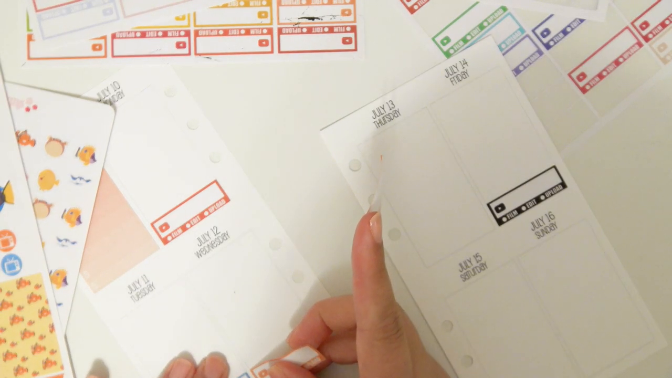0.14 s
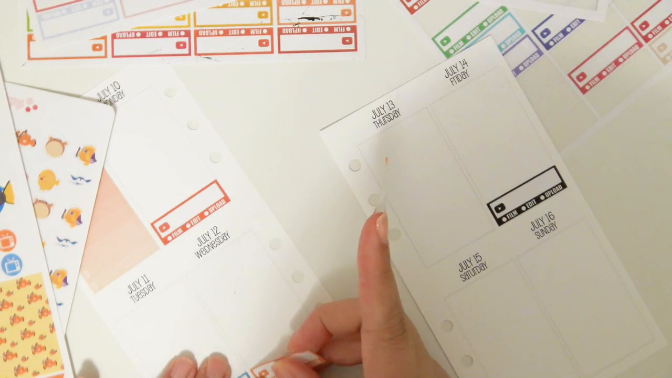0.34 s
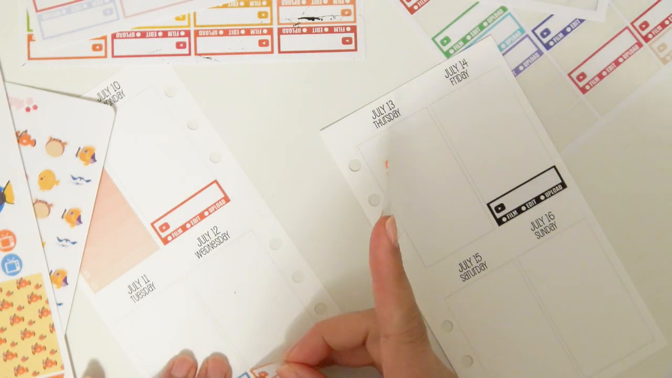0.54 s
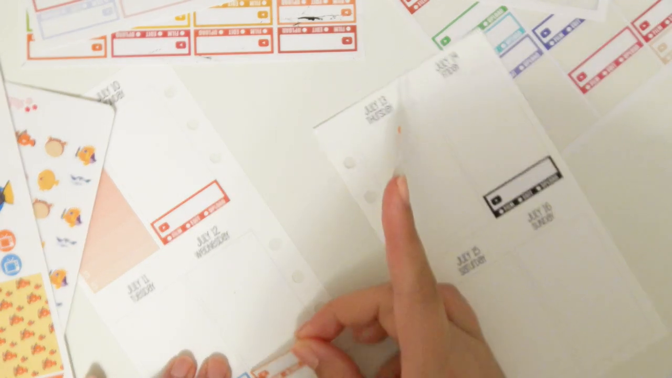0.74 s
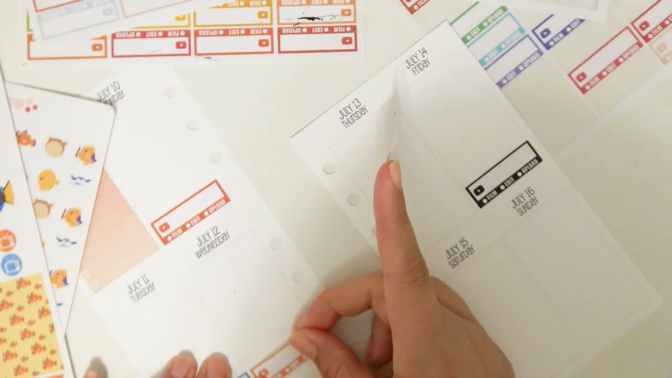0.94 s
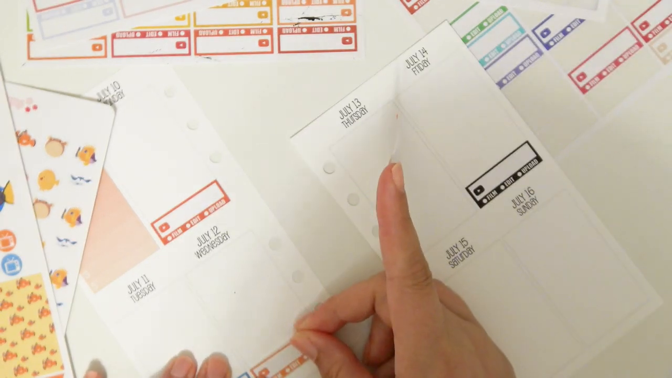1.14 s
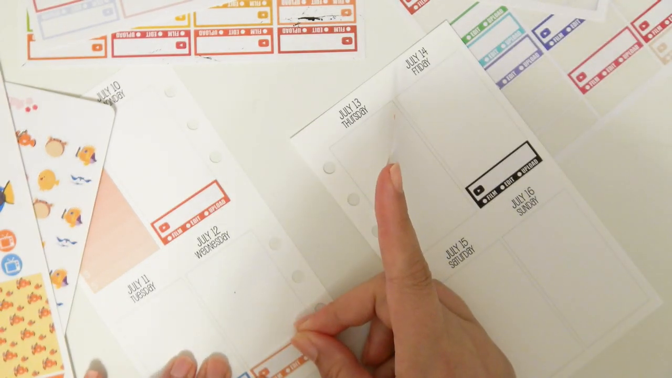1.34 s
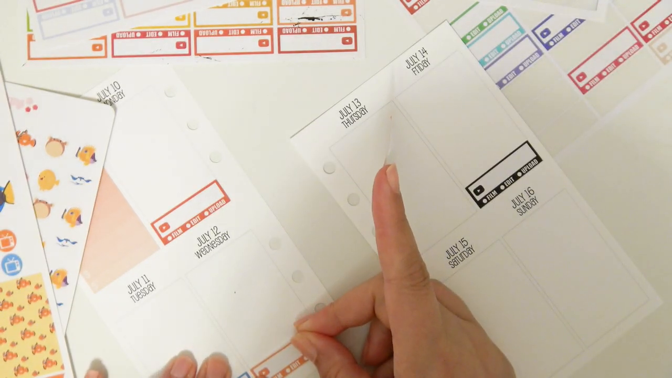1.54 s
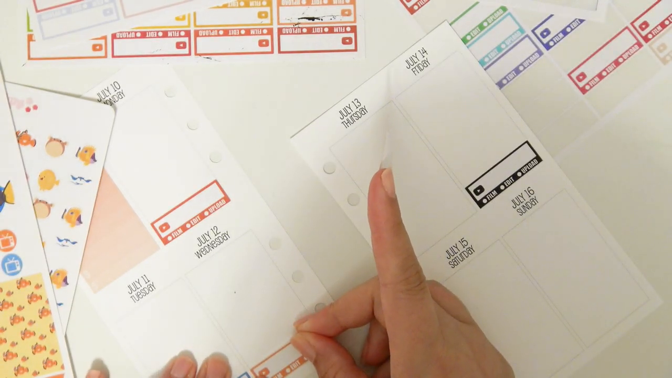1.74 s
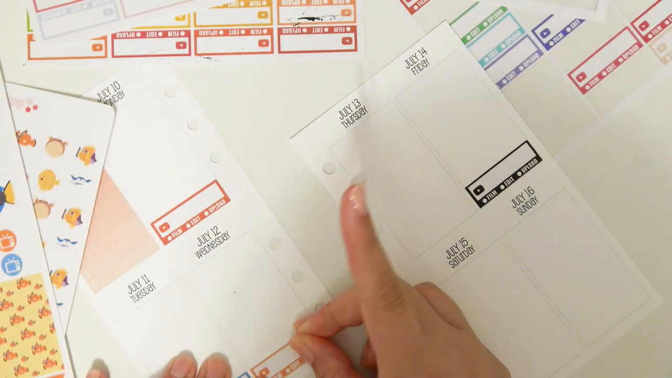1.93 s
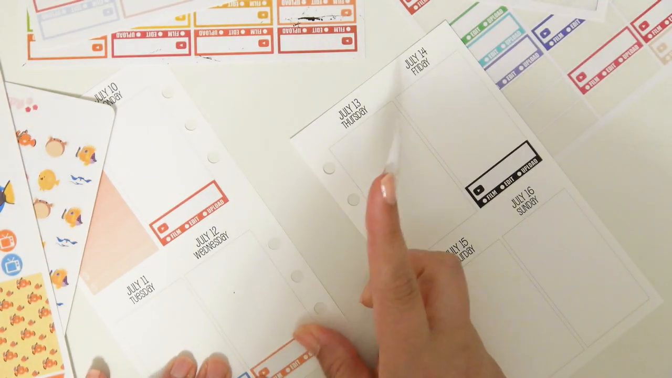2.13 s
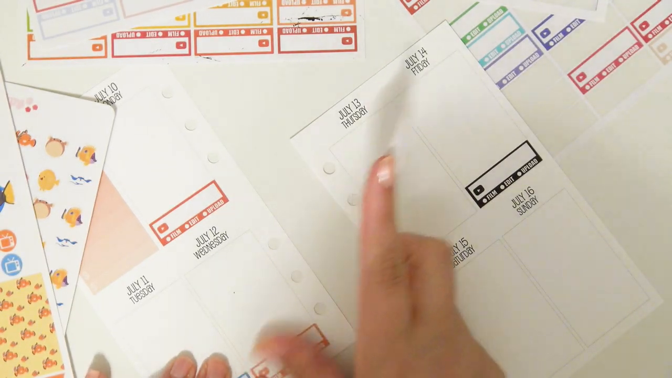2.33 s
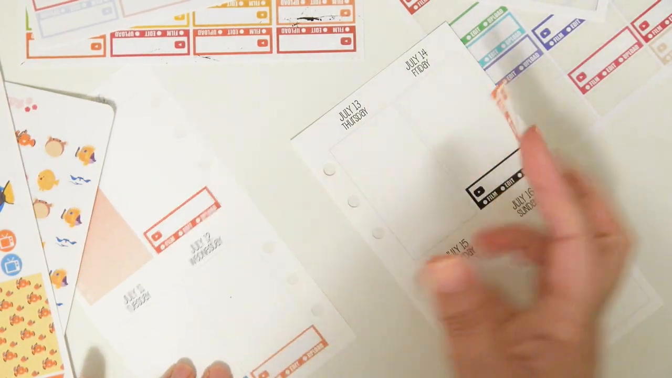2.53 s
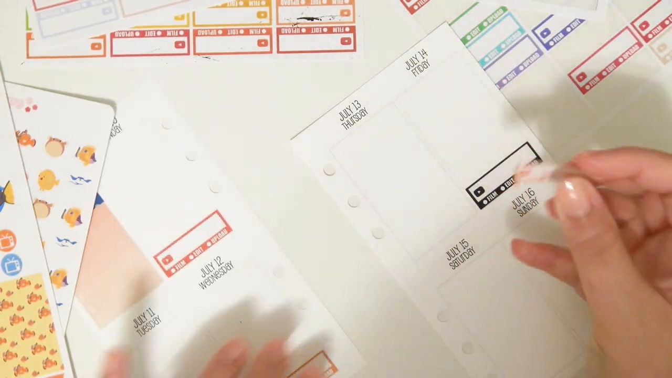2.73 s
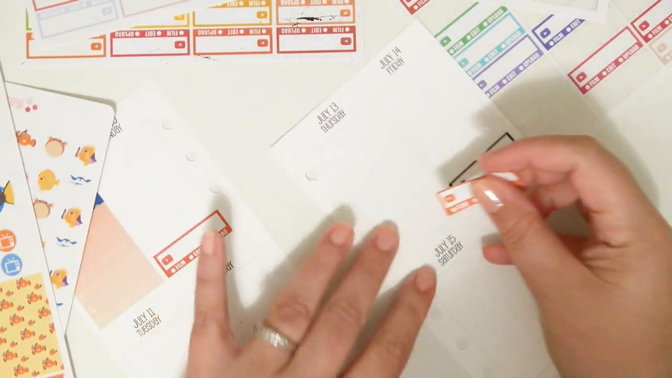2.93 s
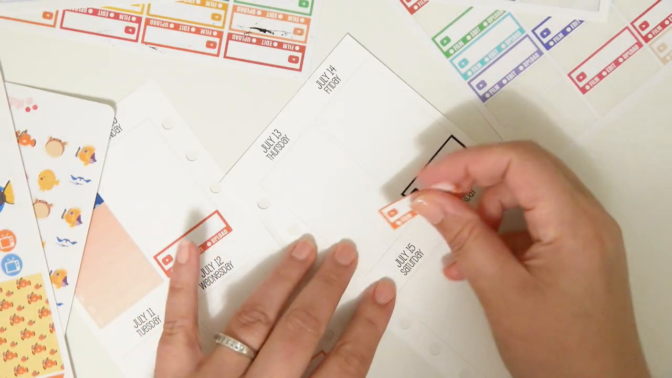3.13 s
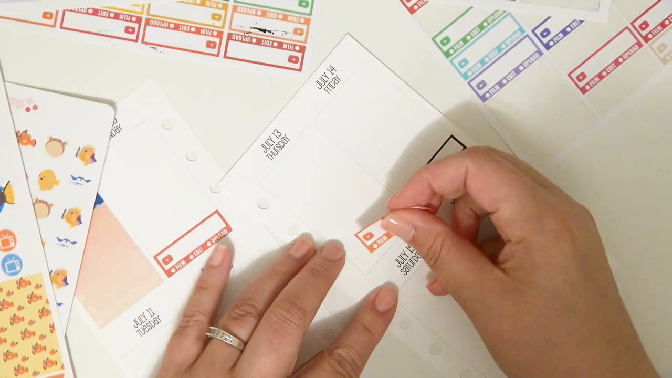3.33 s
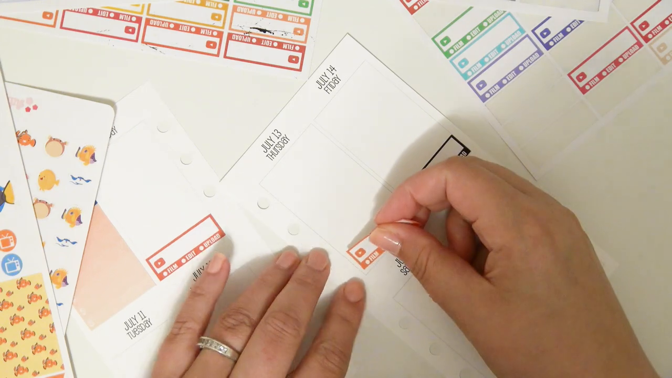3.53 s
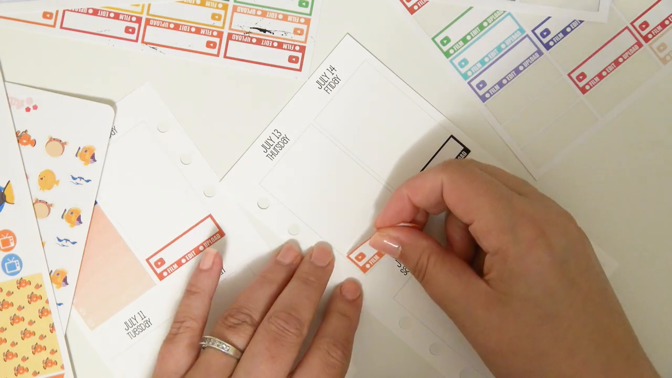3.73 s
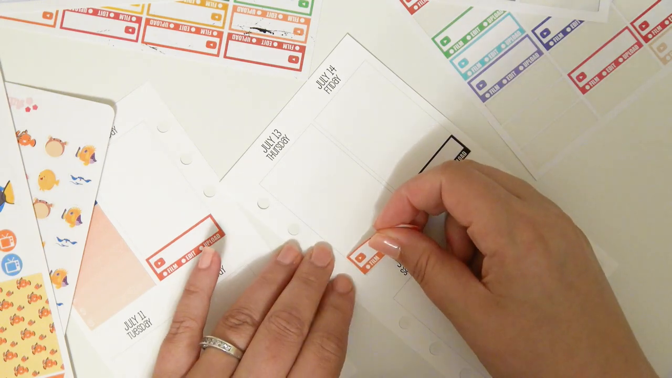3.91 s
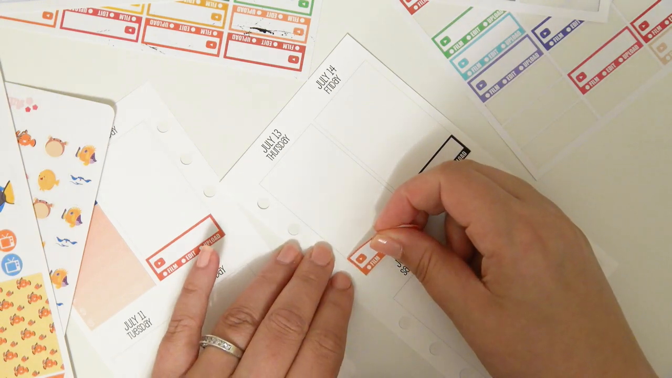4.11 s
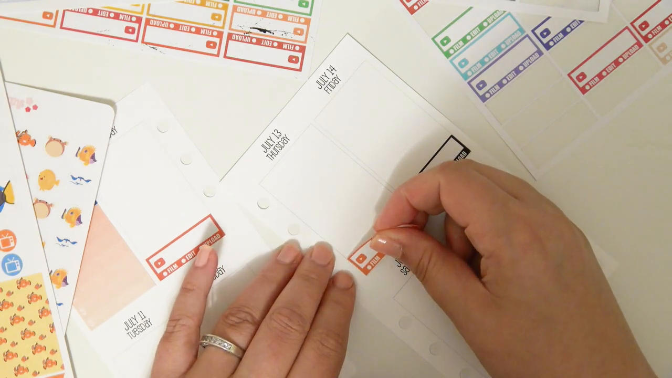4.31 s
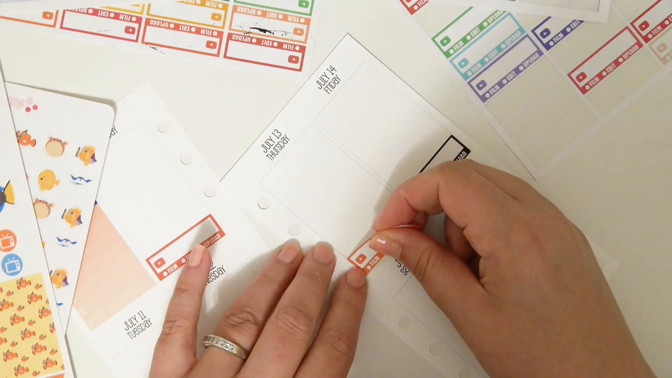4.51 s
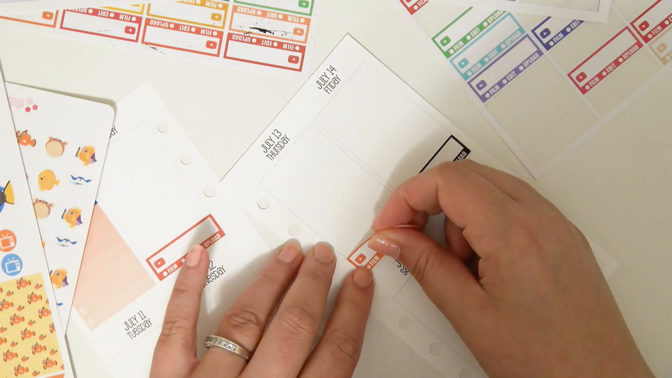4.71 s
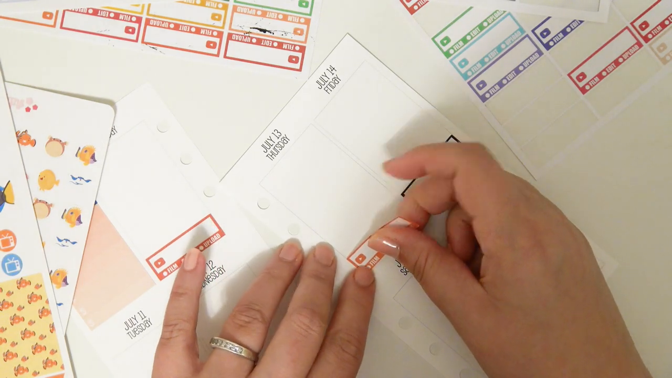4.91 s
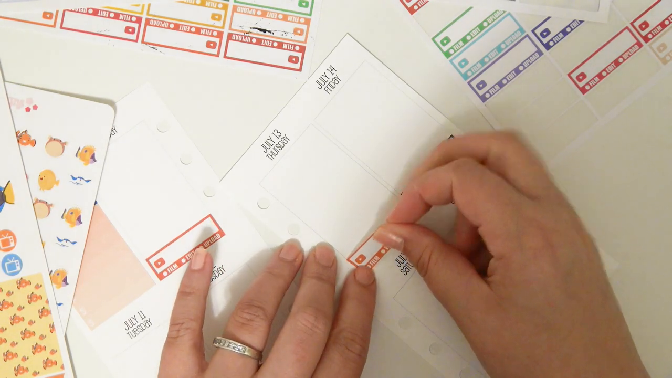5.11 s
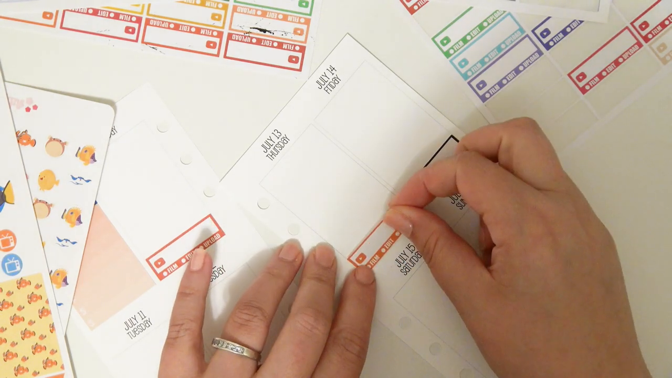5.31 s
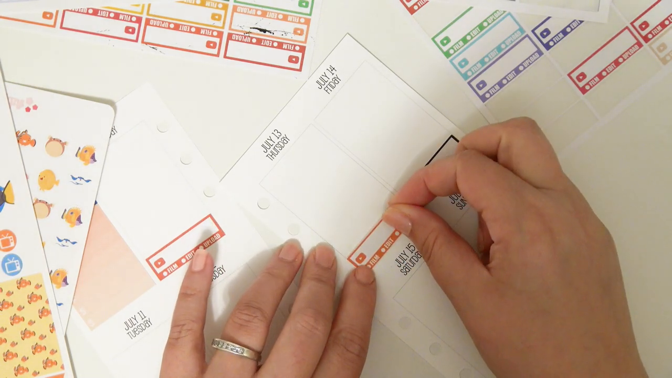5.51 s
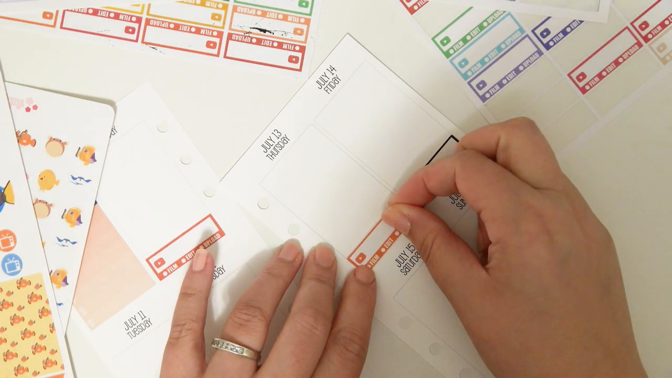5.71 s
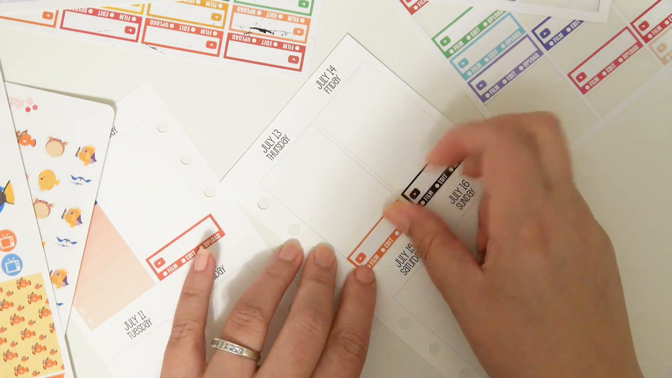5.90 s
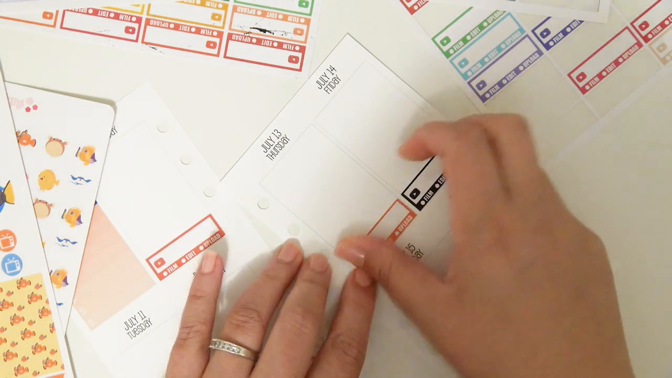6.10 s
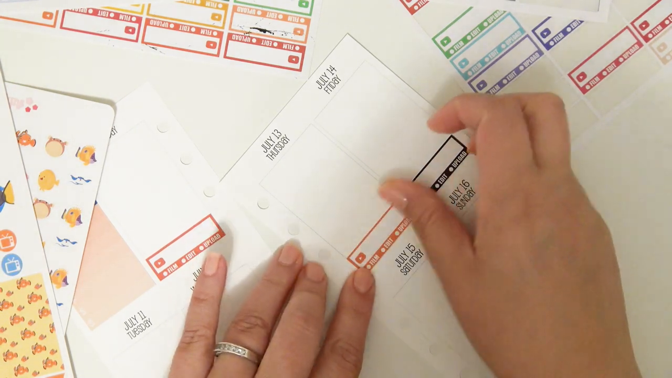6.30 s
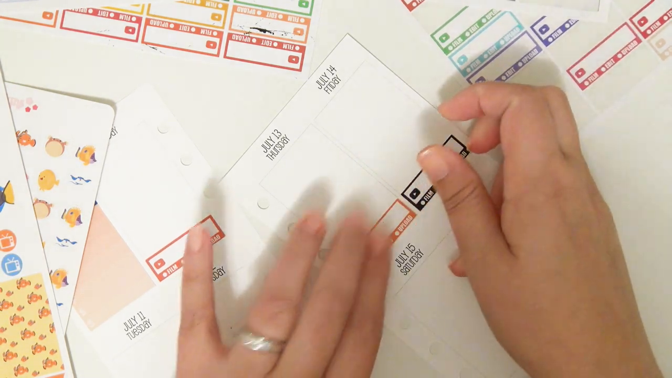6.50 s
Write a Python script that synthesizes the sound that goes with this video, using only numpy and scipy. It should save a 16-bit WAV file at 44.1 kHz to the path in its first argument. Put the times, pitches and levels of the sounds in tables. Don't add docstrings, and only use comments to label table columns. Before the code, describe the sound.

In a small quiet room with a very short tail, thin paper rustles and glue lets go in tiny bright clicks. Crisp snaps come early, around two seconds and most densely near five. Between them fingertips thump the tabletop dully and skin brushes the page. Long gaps leave only soft hiss and a distant low drone. The microphone is close and detailed.

```python
import sys
import numpy as np
from scipy import signal
from scipy.fft import rfft, irfft
from scipy.io import wavfile

SR = 44100
rng = np.random.default_rng(int(sys.argv[2]) if len(sys.argv) > 2 else 0)


def volts_from_decibels(level):
    exponent = np.asarray(level, float) / 20
    return 10 ** exponent


def int16_out(signal):
    q = np.round(np.clip(np.atleast_2d(signal).T, -1, 1) * 32767)
    wavfile.write(sys.argv[1], SR, q.astype(np.int16))


N = 288855

# frequency in Hz, density in dB per Hz.
ROOM_TONE = [(15, -51), (25, -24), (41, -19.5), (64, -0.5), (92, -15.5), (117, -12.5), (166, -17.5),
             (185, -15.5), (256, -16), (285, -16.5), (531, -22), (775, -26.5), (962, -24), (1700, -36),
             (16000, -42.5)]
ROOM_TONE_DB = -48.5
# centre in Hz, width in Hz, level in dB.
MOTOR_DRONE = [(59.27, 5.4, -54), (119.4, 9, -62), (154.25, 13.7, -57.5), (954, 78.9, -65.5),
               (513, 79, -74.5)]
# frequency in Hz, left minus right in dB.
STEREO_LEAN = [(60, -3), (130, -6.5), (290, 2), (640, 1), (1410, 1), (3100, 0), (6820, 1.5), (15000, -1)]
# frequency in Hz, correlation from 0 to 1.
STEREO_LIKENESS = [(60, 0.96), (180, 0.95), (550, 0.88), (1650, 0.91), (4970, 0.64), (15000, 0.67)]

# frequency in Hz, density in dB per Hz.
RUSTLE = [(250, -34.5), (500, -5.5), (900, -5.5), (1500, -1), (3000, -3), (6000, -3.5), (9000, 0.5),
          (11500, 6.5), (13500, 7), (16000, 2)]
RUSTLE_CENTRES_HZ = (1900, 4300, 7600, 11800)
RUSTLE_TOP_HZ = 15900
# start in seconds, length in seconds, bright hiss in dB,
# dull range against it in dB, middle range against it in dB.
SLIDES = [(0, 0.028, -71, -12, 5), (0.197, .045, -57.5, -13, -6.5), (0.326, 0.1, -58.5, -3, -5.5),
          (0.476, 0.061, -56, -3, -2), (0.563, .045, -57, -3, -2), (1.992, 0.081, -67, 10.5, 3.5),
          (2.107, 0.22, -63, 4.5, -2.5), (2.223, 0.047, -48.5, -4, -10), (2.359, .075, -47, -0.5, -9),
          (2.517, .06, -56, -5, -1), (2.569, 0.12, -51, -7.5, -4), (3.145, 0.091, -57, 4, -2.5),
          (3.569, .09, -74, 5, 3), (4.904, .03, -49.5, -10, -4), (4.99, 0.17, -57.5, -8.5, -4),
          (6.081, 0.065, -49, -1.5, -6.5), (6.159, 0.039, -63, 5.5, 0), (6.254, .09, -50, 1.5, -5),
          (6.37, 0.031, -55, 1.5, -2.5)]
# middle in seconds, half length in seconds,
# bright hiss in dB, dull range against it in dB, middle range against it in dB.
BRUSHES = [
    (0.812, 0.089, -56.5, -0.5, -1),
    (2.759, 0.078, -63.5, -2, -1),
    (2.975, 0.061, -50, -3, -2.5),
    (3.336, .05, -67.5, 6.5, -2.5),
    (3.508, 0.044, -56.5, -7, -3),
    (4.758, 0.026, -61, -7.5, -3.5),
    (6.472, 0.043, -66.5, 2, 0),
]
# start in seconds, bright hiss in dB,
# dull range against it in dB, middle range against it in dB, fade in dB per second.
SETTLES = [
    (0.606, -36.5, -5.5, -0.5, 240.5),
    (2.054, -42, 2.5, -1.5, 342),
    (3.012, -42, -4, 0.5, 93),
    (3.672, -63, 4.5, 5, 82.5),
    (4.93, -43.5, -11.5, 6, 450),
    (5.138, -41.5, 0, 2, 186),
    (5.923, -45.5, -0.5, 1.5, 162),
    (6.415, -59.5, 1, -3, 96),
]

# strongest slip in seconds, peak in dB, ring in Hz,
# body below 4 kHz in dB, loss per later slip in dB.
TEARS = [(0.0173, -37.5, 6660, -19, 14), (.6024, -2.5, 10800, -25, 13.5), (0.6046, -4, 10200, -13, 8.5),
         (.6062, -19.5, 3100, -12, 6.5), (2.0492, -7.5, 10200, -8, 10.5), (2.0563, -22, 7500, -20, 7),
         (2.575, -18, 4650, -15, 6), (2.8283, -32.5, 8040, -12, 8), (3.0079, -21, 8300, -11, 4),
         (3.0113, -21, 3000, -14, 16), (3.0117, -12, 11300, -23.5, 7), (3.1797, -29.5, 4000, 0.5, 7),
         (3.6628, -35, 2470, 8, 6.5), (4.9244, -15.5, 12500, -19, 0), (4.927, -8.5, 7350, -19.5, 7),
         (5.0542, -27, 8550, -20, 12), (5.055, -36.5, 2870, -12, 13), (4.89, -29, 12200, -17, 3),
         (5.0658, -20, 10100, -28, 8), (5.097, -23.5, 11000, -14, 6), (5.119, -27.5, 9900, -19, 0.5),
         (5.1331, -1, 12000, -16, 7.5), (5.9201, -10.5, 12000, -15, 3.5), (5.9246, -21, 11500, -16, 7)]
# start in seconds, peak in dB, ring in Hz, body below 4 kHz in dB.
TICKS = [(.0286, -42, 6500, -16), (.1952, -43, 11900, -16), (.3241, -34, 8000, -15),
         (.3413, -23, 13400, -22), (.5438, -32, 12100, -11), (.5559, -25, 10500, -15),
         (.5703, -32, 10200, -16), (.5825, -28, 9600, -22), (.593, -27, 12400, -13),
         (.5962, -16, 9200, -23), (.5994, -20, 8900, -21), (.638, -22, 12200, -20),
         (2.5225, -36, 5800, -12), (2.6695, -48, 2600, 6), (2.959, -24, 12000, -12),
         (2.9738, -28, 11900, -14), (2.9836, -30, 13100, -13), (3.486, -32, 4800, -18),
         (3.593, -52, 2600, 6), (3.8827, -40, 11900, -16), (4.0088, -47, 6600, -7),
         (4.8871, -23, 12100, -24), (4.9122, -26, 12800, -21), (4.9176, -24, 12800, -16),
         (4.9217, -21, 12100, -14), (4.9484, -28, 7400, -13), (5.0284, -35, 9100, -17),
         (5.1107, -29, 12900, -15), (5.1497, -23, 10000, -12), (6.4434, -36, 9300, 2)]
# start in seconds, end in seconds, resonance in Hz, width in Hz, level in dB.
SINGING = [(0.2, 0.248, 11800, 1200, -51.5), (0.202, 0.24, 6700, 600, -55), (0.32, 0.437, 11200, 1300, -53),
           (0.471, 0.53, 10800, 1800, -50.5), (0.47, .53, 6430, 600, -61), (0.758, 0.884, 2070, 500, -57.5),
           (1.992, 2.046, 1940, 249, -59.5), (2.4, 2.429, 1330, 200, -48.5), (3.199, 3.356, 755, 403, -56),
           (3.55, 3.562, 5060, 497, -50.5), (3.574, 3.58, 4900, 603, -56), (6.057, 6.069, 4930, 600, -47),
           (6.248, 6.28, 1346, 130, -47), (6.249, 6.412, 580, 500, -51), (6.316, 6.349, 1125, 200, -45.5),
           (6.321, 6.362, 402, 80, -44.5), (0.788, 0.937, 8440, 3500, -58.5),
           (2.223, 2.278, 9100, 5000, -50), (2.353, 2.385, 6800, 1800, -47.5),
           (2.58, 2.678, 7860, 5030, -45), (3.014, 3.085, 5000, 2500, -48),
           (4.734, 4.785, 7500, 2000, -61.5), (6.074, 6.12, 2110, 400, -53),
           (6.257, 6.332, 9000, 4000, -49)]

# start in seconds, peak in dB, main ring in Hz,
# knock above 300 Hz in dB, contact in milliseconds.
THUMPS = [(0.604, -27, 164, -13.5, 2.5), (2.0482, -20, 477, 0, 0.53), (2.053, -27, 196, 0, 1.3),
          (2.273, -24, 164, -23, 1.7), (2.397, -46, 164, -8, 1.3), (2.502, -40.5, 150, -11, 1.6),
          (2.961, -17, 132.5, -20.5, 3.8), (3.180, -23.5, 146.5, -8, 0.69), (3.663, -28, 145, -13, 2.1),
          (4.67, -40, 153, -29, 2.35), (4.928, -25, 147, -10.5, 2.4), (5.132, -33, 164, -8.5, 0.98),
          (5.922, -30, 173, -10, 0.61), (5.922, -20.5, 430, -9.5, 0.39), (6.137, -31, 167, -14.5, 4.6),
          (6.441, -37, 164, -5.5, 0.46)]
# frequency in Hz, level in dB, time to fall 60 dB in seconds.
TABLE_MODES = [(105, -62, 0.088), (136, -9.5, 0.3), (164, -1.5, 0.084), (199, 8, 0.0334),
               (276, -12.5, 0.046)]
# frequency in Hz, time to fall 60 dB in seconds.
ROOM_T60 = [(100, 0.3), (1000, 0.34), (4000, 0.049), (12000, 0.24)]


def rms_one(x):
    return x / np.sqrt(np.mean(x ** 2) + 1e-20)


def at_hz(points, hz):
    table_hz, value = np.array(points).T
    return np.interp(np.log(hz), np.log(table_hz), value)


def shaped(x, db):
    return irfft(rfft(x) * volts_from_decibels(db), N)


def resonance(x, hz, width_hz):
    r = np.exp(-np.pi * width_hz / SR)
    poles = [1, -2 * r * np.cos(2 * np.pi * hz / SR), r * r]
    return signal.lfilter((1 - r * r) / 2 * np.array([1, 0, -1]), poles, x)


def ring(x, hz, t60):
    r, w = volts_from_decibels(-60 / (t60 * SR)), 2 * np.pi * hz / SR
    return signal.lfilter([0, np.sin(w)], [1, -2 * r * np.cos(w), r * r], x + 1e-18)


def drift(rate):
    r = np.exp(-2 * np.pi * rate / SR)
    noise = rng.standard_normal(N + SR)
    return rms_one(signal.lfilter([1], [1, -2 * r, r * r], noise)[SR:])


def add(out, sound, s):
    i = round(s * SR)
    out[..., i:i + sound.shape[-1]] += sound[..., :N - i]


def room_tone():
    hz = np.fft.rfftfreq(N, 1 / SR) + 1
    tone_db = at_hz(ROOM_TONE, hz)
    mid, side = (rms_one(shaped(rng.standard_normal(N), tone_db)) * volts_from_decibels(ROOM_TONE_DB - 4.5) for _ in "ms")
    for centre_hz, width_hz, db in MOTOR_DRONE:
        hum = resonance(rng.standard_normal(N), centre_hz, width_hz)
        mid = mid + volts_from_decibels(db) * rms_one(resonance(hum, centre_hz, width_hz))
    alike = np.clip(at_hz(STEREO_LIKENESS, hz), 0, .999)
    side = irfft(rfft(side) * np.sqrt((1 - alike) / (1 + alike)) * volts_from_decibels(-0.5), N)
    lean_db = at_hz(STEREO_LEAN, hz) / 2
    top_db = -40. * (hz > RUSTLE_TOP_HZ)
    return np.array([shaped(mid + side, top_db + lean_db), shaped(mid - side, top_db - lean_db)])


def pressure():
    attack_s, attack_share, release_db_per_s = .004, .04, 701
    settle_attack_s = 0.0044
    patchy_db, patch_rate_hz = 1.5, 12
    t, power = np.arange(0, N + 16, 16) / SR, 0

    def colour(db, dull_db, middle_db):
        top_db = -3.5 - .2 * dull_db
        return db + np.array([[dull_db], [middle_db], [0], [top_db]])

    for start, length, *tone in SLIDES:
        rise = np.exp(-(np.minimum(t - start, 0) / (attack_s + attack_share * length)) ** 2)
        release_db = release_db_per_s * np.maximum(t - start - length, 0)
        power += rise * volts_from_decibels(colour(*tone) - release_db) ** 2
    for middle, half, *tone in BRUSHES:
        power += volts_from_decibels(colour(*tone)) ** 2 * np.exp(-2 * ((t - middle) / half) ** 2)
    for start, *tone, fade_db in SETTLES:
        rise = np.clip((t - start) / settle_attack_s + 1, 0, 1)
        power += (rise * volts_from_decibels(colour(*tone) - fade_db * np.abs(t - start))) ** 2
    samples_s = np.arange(N) / SR
    return [np.interp(samples_s, t, np.sqrt(row)) * volts_from_decibels(patchy_db * drift(patch_rate_hz)) for row in power]


def sliding(grain_db, flicker_db):
    octave, out = np.log(np.fft.rfftfreq(N, 1 / SR) + 1), np.zeros(N)
    grains = rng.standard_normal(N) * volts_from_decibels(grain_db * drift(498) + flicker_db * drift(45))
    spectrum = rfft(grains) * volts_from_decibels(at_hz(RUSTLE, np.exp(octave))) * (octave < np.log(RUSTLE_TOP_HZ))
    for share, gain in zip(np.eye(4), pressure()):
        band = irfft(spectrum * np.interp(octave, np.log(RUSTLE_CENTRES_HZ), share), N)
        out += rms_one(band) * gain
    return out


def slips():
    gap_s, lead_db = .0011, -9.5
    dulling_db, wander_db = 4, 1
    rows = list(TICKS)
    for (s, db, hz, body_db, loss_db), luck in zip(TEARS, rng.standard_normal((len(TEARS), 5, 2))):
        for k, (late, wander) in zip(range(-1, 4), luck):
            step_db = lead_db if k < 0 else -loss_db * k
            slip_s = s + gap_s * k * (1 + .1 * late)
            slip_hz = min(hz * volts_from_decibels(wander_db * abs(k) * wander), 14000)
            rows.append((slip_s, db + step_db, slip_hz, body_db + dulling_db * min(k, 2)))
    return rows


def crack(force, hz, body_db, sharp):
    height = hz / 10000
    width_hz = hz * height / sharp
    pitched = resonance(resonance(force, hz, width_hz), hz, 4.9 * width_hz)
    bright = pitched + 0.17 * height ** 3 * resonance(force, 12000, 11070)
    body = signal.sosfilt(signal.butter(3, [800, 3400], "band", fs=SR, output="sos"), force)
    return bright / np.abs(bright).max() + volts_from_decibels(body_db) * body / np.abs(body).max()


def ticks():
    slip_decay_s = .00055
    out, t, rows = np.zeros((2, N)), np.arange(300) / SR, slips()
    for (s, db, hz, body_db), noise in zip(rows, rng.standard_normal((len(rows), 301))):
        force = (noise[1:] + 2.0 * (t == 0)) * np.exp(-t / slip_decay_s)
        sound = volts_from_decibels(db - 1.5) * crack(force, hz, body_db, sharp=3.3)
        pan_db = np.array([[.9], [-.9]]) * noise[0]
        add(out, sound * volts_from_decibels(pan_db), s)
    return out


def singing():
    out = np.zeros(N)
    for (start, end, hz, width_hz, db), noise in zip(SINGING, rng.standard_normal((len(SINGING), SR // 4))):
        tone = resonance(resonance(noise, hz, width_hz), hz, width_hz)[:round((end - start) * SR)]
        add(out, volts_from_decibels(db) * rms_one(tone) * signal.windows.tukey(len(tone), .6), start)
    return out


def thumps():
    main_t60_s, main_ring_db = 0.14, 6.5
    panel_t60_s, panel_slope_db = 0.093, -2.5
    out, t = np.zeros(N), np.arange(SR // 3) / SR
    panel_hz = np.geomspace(301.5, 2283, num=26) * volts_from_decibels(rng.normal(0, 0.3, 26))
    for (s, db, main_hz, knock_db, contact_ms), luck in zip(THUMPS, rng.standard_normal((len(THUMPS), 31))):
        push = np.sin(np.pi * np.minimum(t / (contact_ms / 1000), 1)) ** 2
        tap = np.sin(np.pi * np.minimum(t / (contact_ms / 4000), 1)) ** 2
        low = volts_from_decibels(main_ring_db) * ring(push, main_hz, main_t60_s * np.sqrt(160 / main_hz))
        for (hz, level_db, t60), u in zip(TABLE_MODES, luck):
            low = low + volts_from_decibels(level_db + 4.4 * u) * ring(push, hz, t60)
        high = 0
        for k, hz in enumerate(panel_hz):
            mode_db = panel_slope_db * np.log2(hz / 500) + 2 * luck[-k - 1]
            high = high + (-1) ** k * volts_from_decibels(mode_db) * ring(tap, hz, panel_t60_s * (500 / hz) ** 0.92)
        knock = volts_from_decibels(knock_db) * high / np.abs(high).max()
        add(out, volts_from_decibels(db) * (knock - low / np.abs(low).max()), s)
    return out


def room(x):
    level_db, width = -12, 0.29
    t, tail = np.arange(SR // 2) / SR, 0
    edges = 90 * 2. ** np.arange(0, 7.6, .75)
    for low, high in zip(edges, edges[1:]):
        band_pass = signal.butter(2, [low, high], "band", fs=SR, output="sos")
        band = signal.sosfilt(band_pass, rng.standard_normal((2, len(t))))
        tail = tail + band * volts_from_decibels(-60 * t / at_hz(ROOM_T60, np.sqrt(low * high)))
    tail = tail * np.clip((t - .003) / 0.0017, 0, 1)
    tail = (tail[0] + width * tail[1] * [[1], [-1]]) / np.sqrt(np.sum(tail[0] ** 2))
    return volts_from_decibels(level_db) * signal.fftconvolve(x[None], tail, axes=1)[:, :N]


def scene():
    bright = sliding(grain_db=-1.5, flicker_db=1.28) + singing() + ticks()
    knocks = thumps()
    table = bright + knocks * volts_from_decibels([[-.9], [.9]]) + room(bright.mean(axis=0) + knocks)
    low_cut = signal.butter(2, 60, "high", fs=SR, output="sos")
    return signal.sosfilt(low_cut, table) + room_tone()


def band_limit(x):
    return signal.sosfilt(signal.butter(12, 16990, fs=SR, output="sos"), x)


def record(dry):
    top_cut = signal.cheby2(12, 70, 17300, fs=SR, output="sos")
    return band_limit(signal.sosfilt(top_cut, dry))


dry = scene()
out = record(dry)
int16_out(out)
```